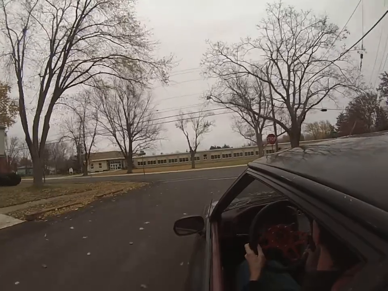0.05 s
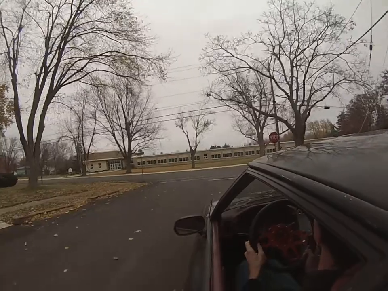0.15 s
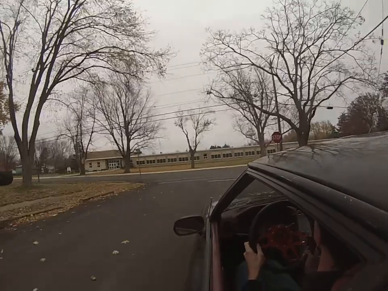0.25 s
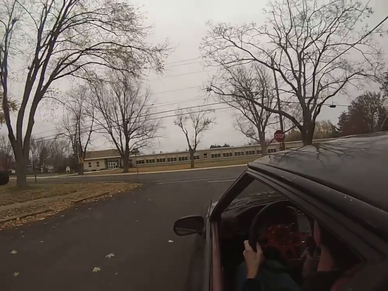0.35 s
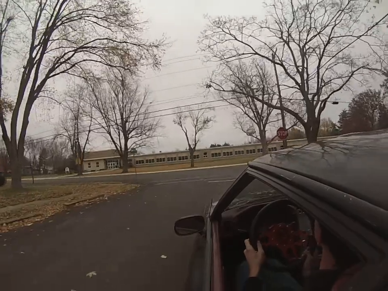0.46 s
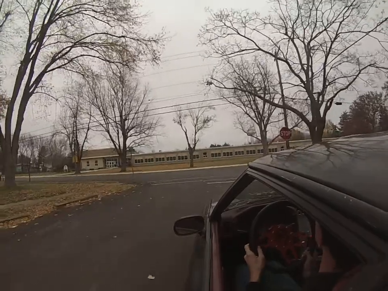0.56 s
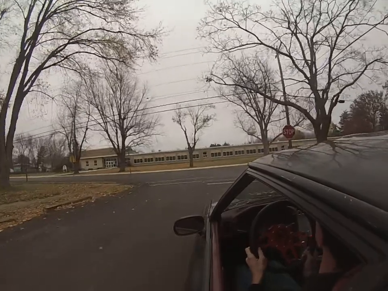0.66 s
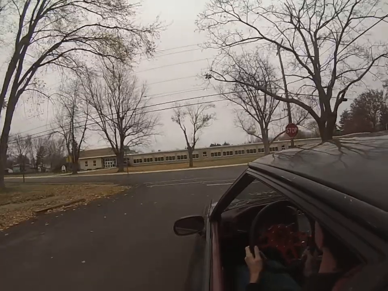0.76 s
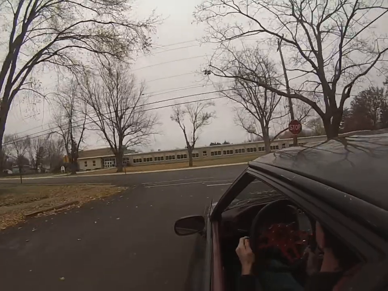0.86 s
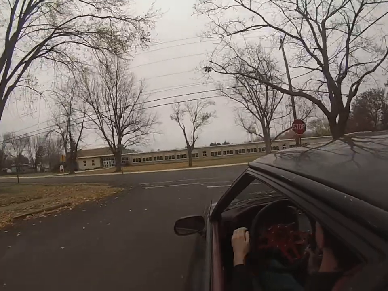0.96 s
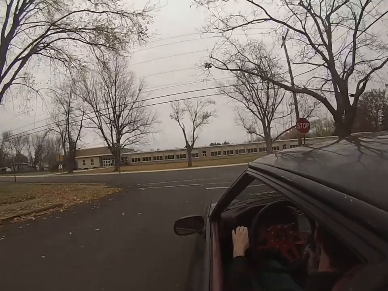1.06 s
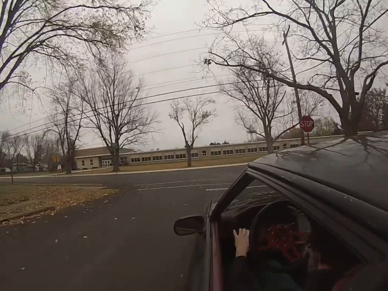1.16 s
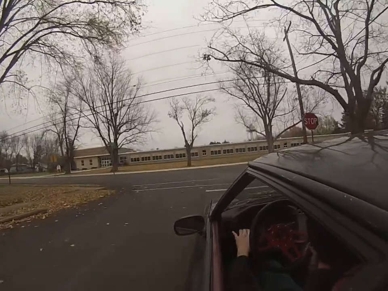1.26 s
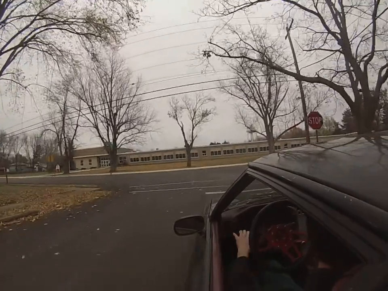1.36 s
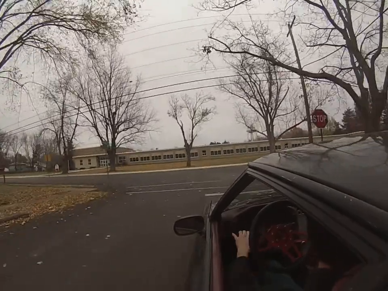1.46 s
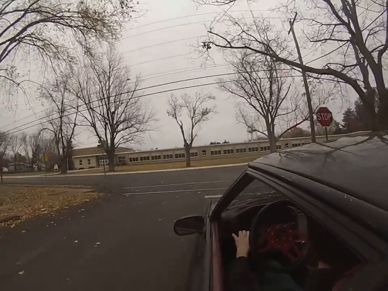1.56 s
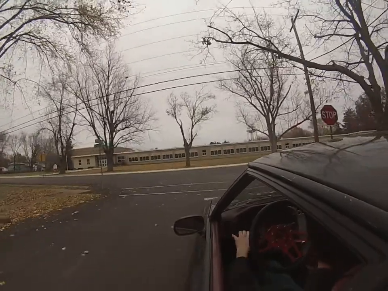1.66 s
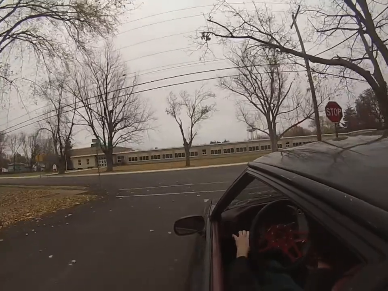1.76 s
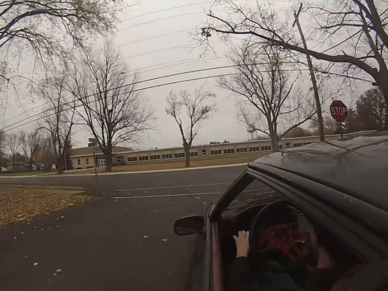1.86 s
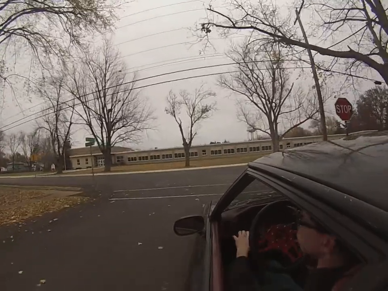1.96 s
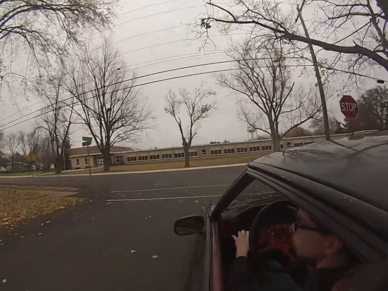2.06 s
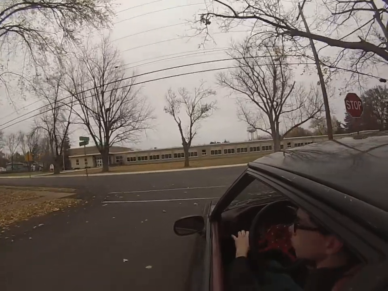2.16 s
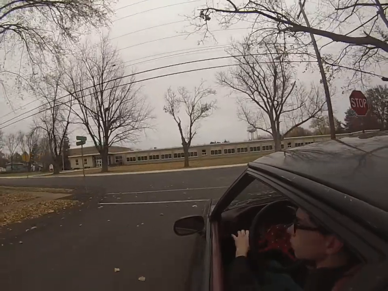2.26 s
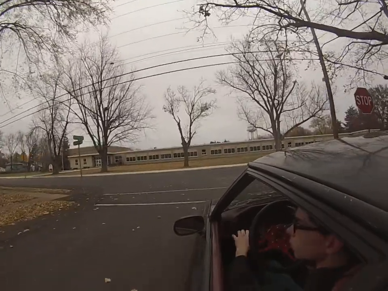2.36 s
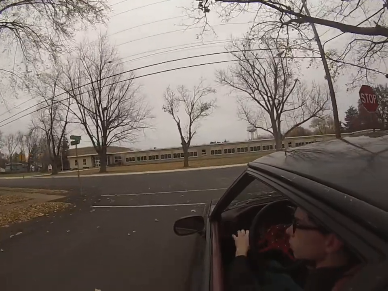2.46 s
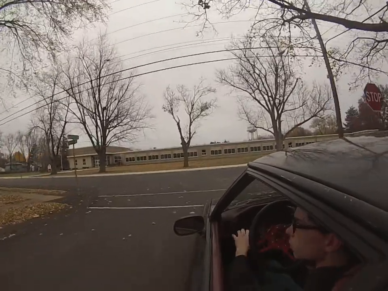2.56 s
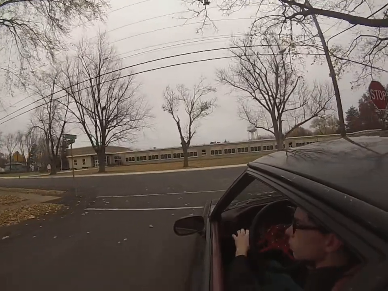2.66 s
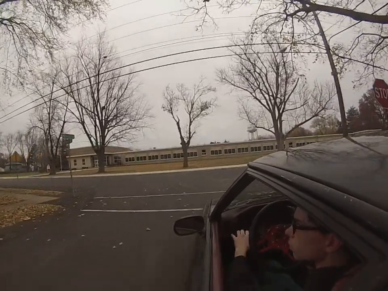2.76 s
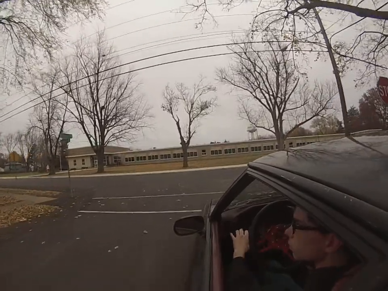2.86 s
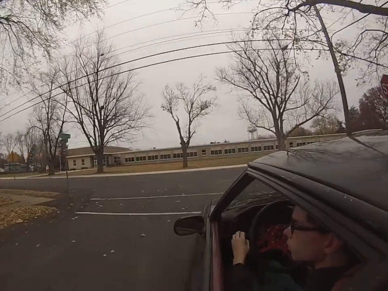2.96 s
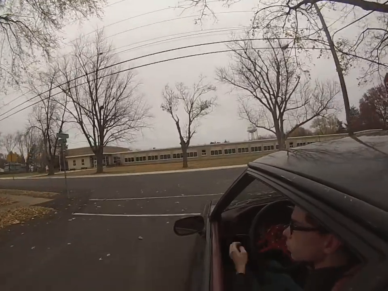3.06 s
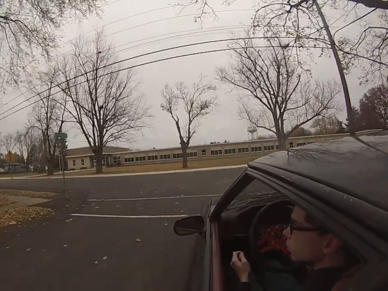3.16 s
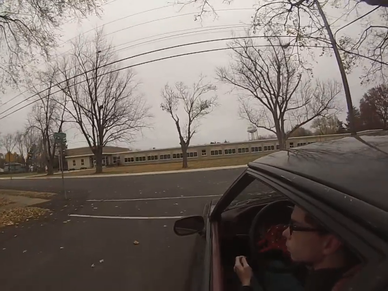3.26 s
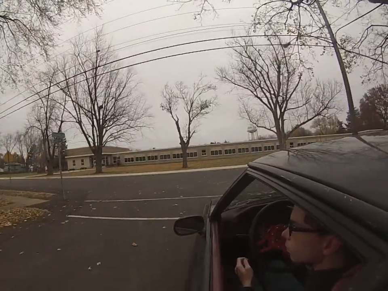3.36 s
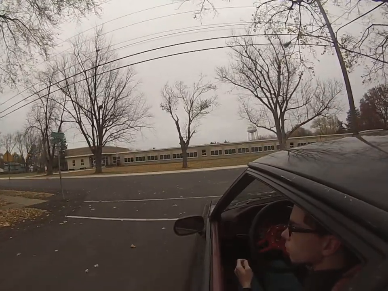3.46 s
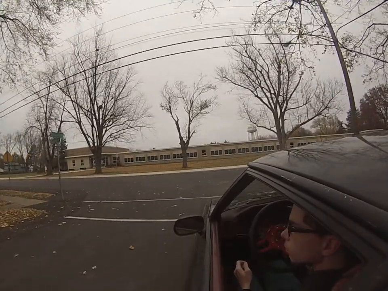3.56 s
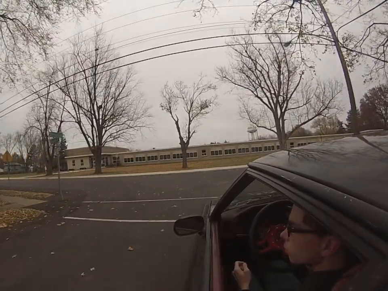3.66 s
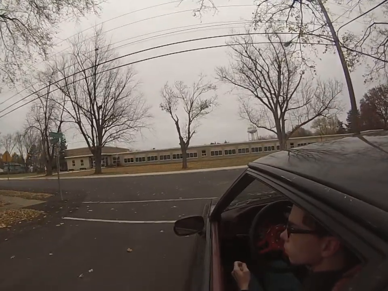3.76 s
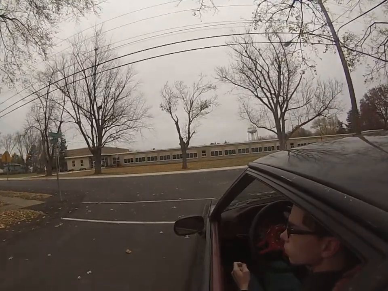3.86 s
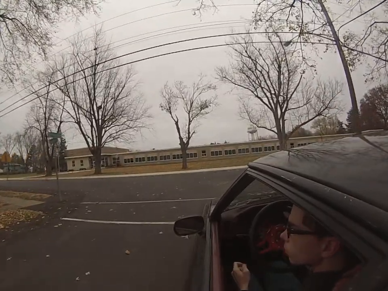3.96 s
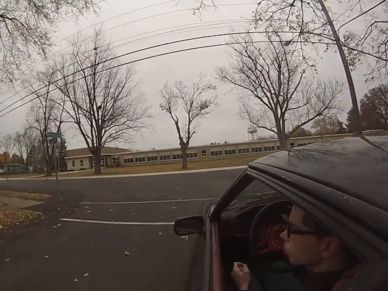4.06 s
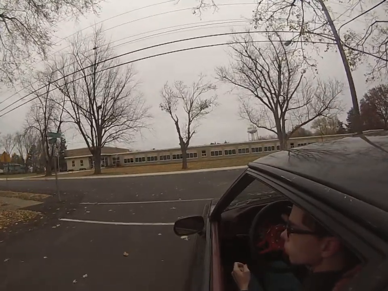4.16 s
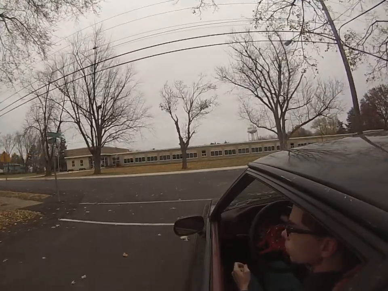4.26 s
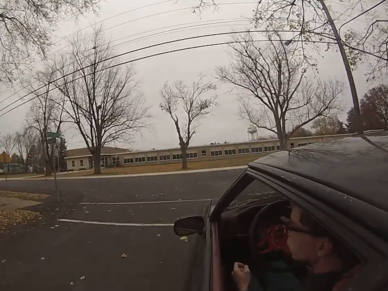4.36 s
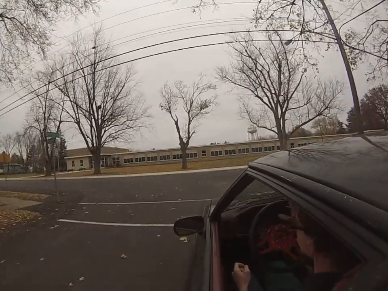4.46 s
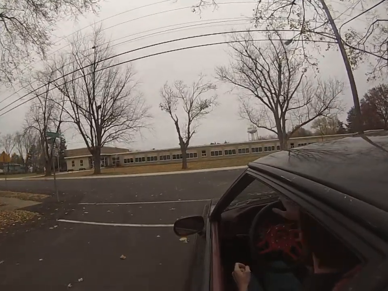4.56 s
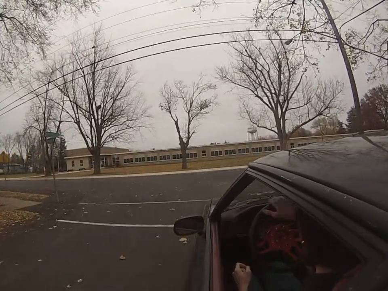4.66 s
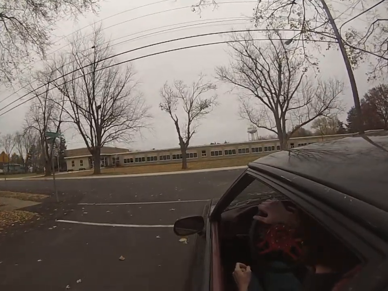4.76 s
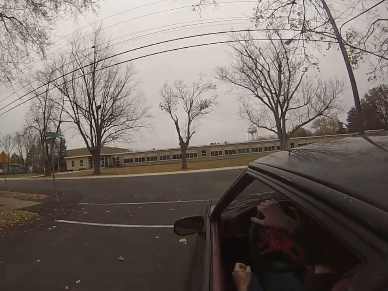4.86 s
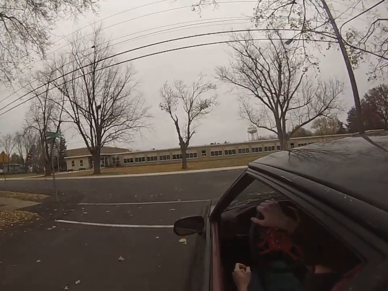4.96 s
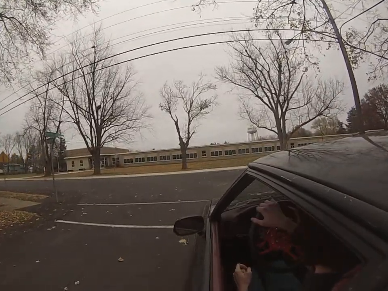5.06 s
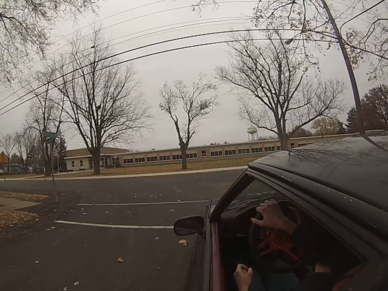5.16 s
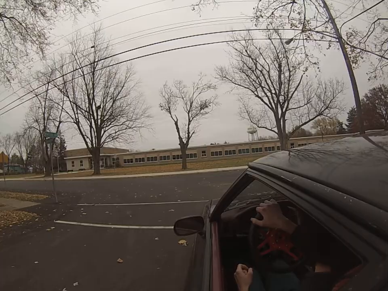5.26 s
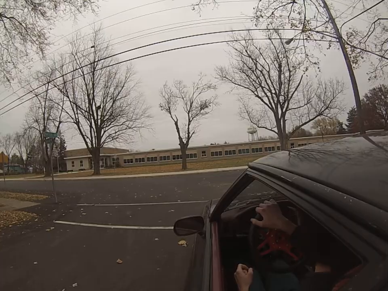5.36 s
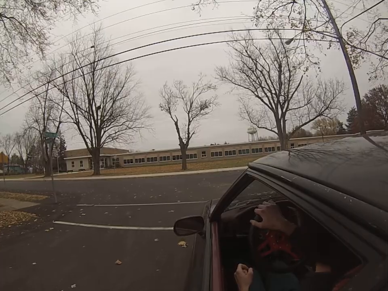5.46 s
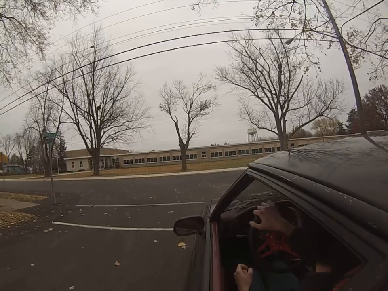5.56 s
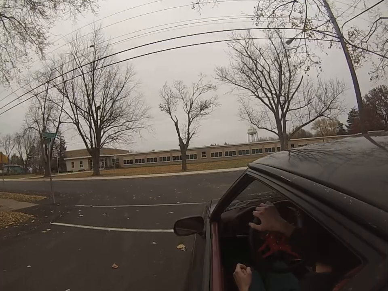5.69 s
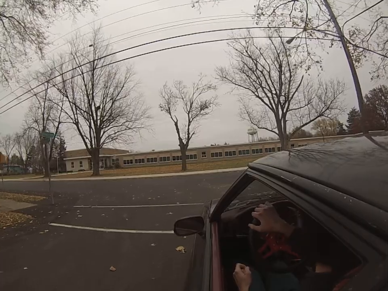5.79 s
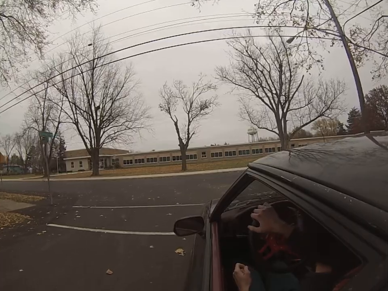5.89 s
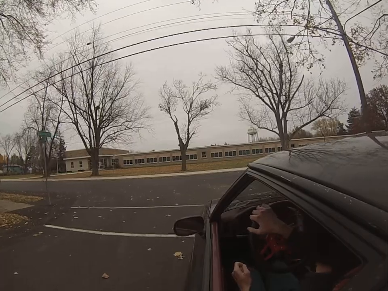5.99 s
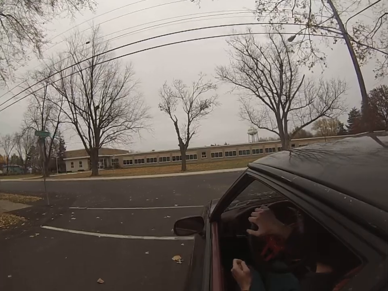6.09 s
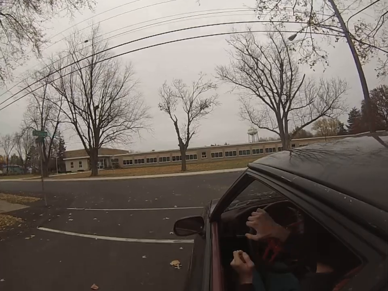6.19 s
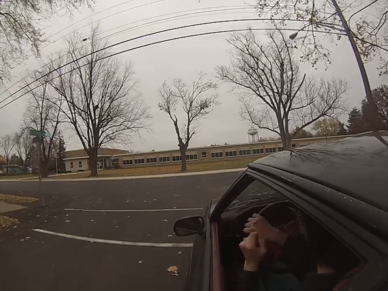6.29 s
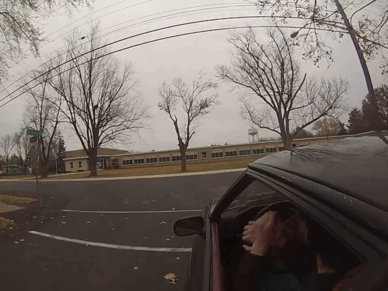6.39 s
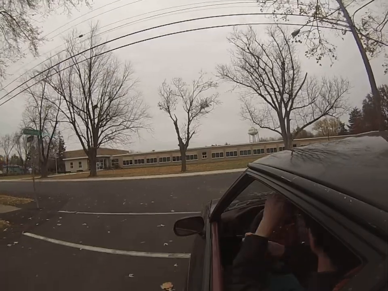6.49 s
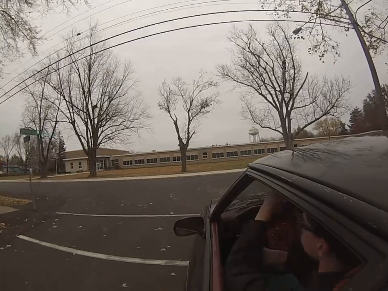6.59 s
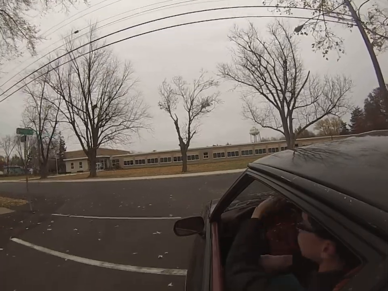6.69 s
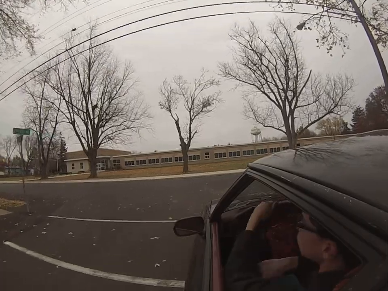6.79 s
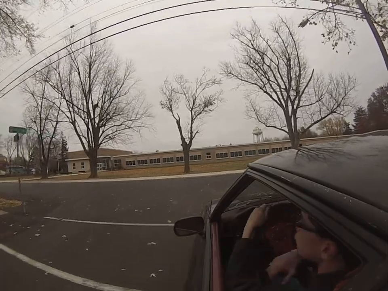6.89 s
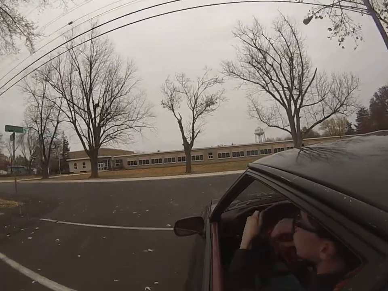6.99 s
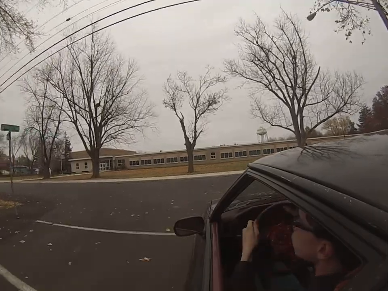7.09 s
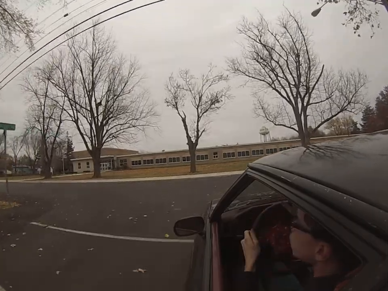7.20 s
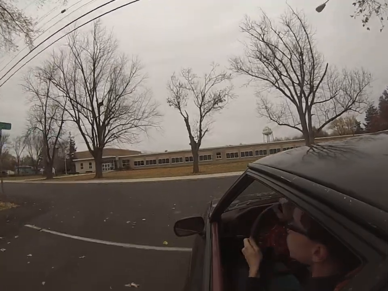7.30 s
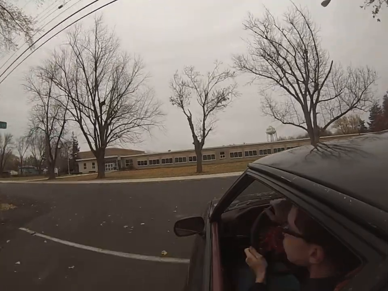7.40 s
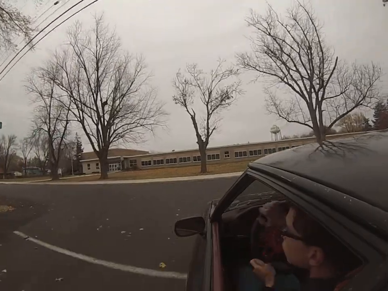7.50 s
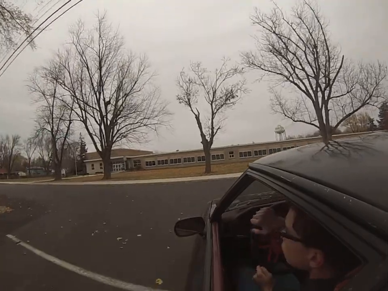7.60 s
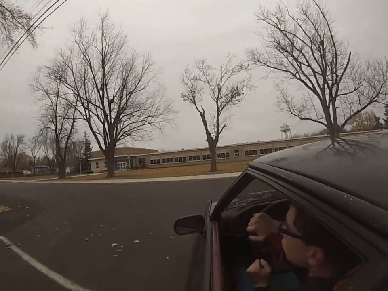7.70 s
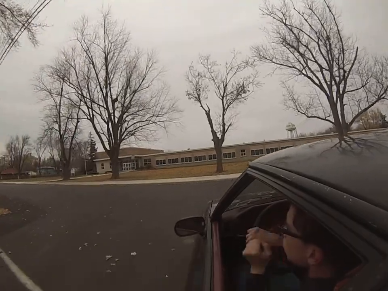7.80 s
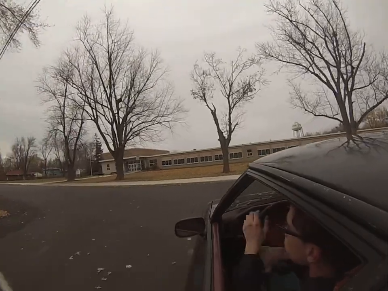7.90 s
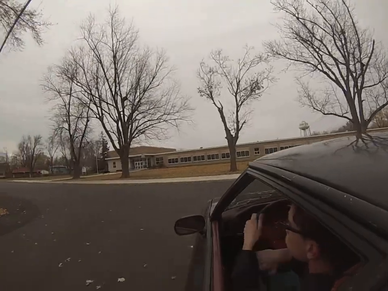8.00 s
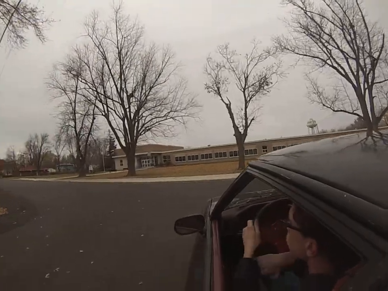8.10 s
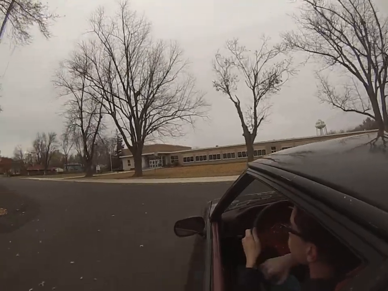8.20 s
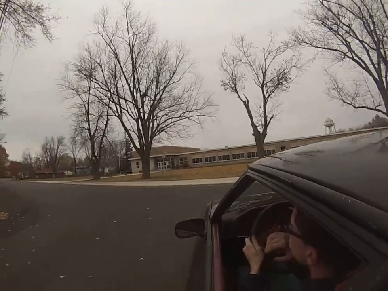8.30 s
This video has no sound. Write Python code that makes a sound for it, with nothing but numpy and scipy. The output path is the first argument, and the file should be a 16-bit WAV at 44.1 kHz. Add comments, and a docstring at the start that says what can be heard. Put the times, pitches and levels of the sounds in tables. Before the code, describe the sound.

Close, boxy, muffled sound on the outside of a sports car in the street, with little wind. First a quiet throbbing idle, low panel drone and fluttering ticks, with a faint mount rattle. The car stops with a soft scuff; irregular pops follow as the throttle is touched. The engine then rises quickly to a buzzing, booming peak, and its pitch falls as the clutch bites, ending in low shudder and loud clatter.

```python
"""On the body of a rotary sports car, with the microphone in a closed housing clamped to it.
The car rolls to a stop at idle, revs up, lets in the clutch and pulls away; the mount then shudders and rattles.
The engine is sines locked to the shaft plus noise that puffs at every firing. Bass comes through the clamp,
the rest through the housing, which rings near 1.5 kHz. Something like a fuel pump ticks steadily in impulses
that ring; knocks and rattles are scatters of impulses that ring too."""
import sys
import numpy as np
from scipy import signal
from scipy.fft import rfft, irfft
from scipy.io import wavfile
from scipy.ndimage import uniform_filter1d

SR = 44100
rng = np.random.default_rng(int(sys.argv[2]) if len(sys.argv) > 2 else 0)


def waveform_to_disk(signal):
    """Save audio, clipped to [-1, 1], as 16-bit WAV at the path in sys.argv[1]."""
    frames = np.transpose(np.atleast_2d(signal))
    scaled = np.clip(frames, -1, 1) * 32767
    samples = np.round(scaled).astype(np.int16)
    wavfile.write(sys.argv[1], SR, samples)


N = 367794


def gain_of(db):
    """Decibels to an amplitude factor."""
    return 10 ** (np.asarray(db) / 20)


def evened(x):
    """Scales to rms 1."""
    return x / np.sqrt(np.mean(x ** 2) + 1e-20)


def read(points, hz):
    """Level in dB of a spectrum at the pitches hz, straight between points on a log pitch scale."""
    point_hz, level_db = np.transpose(points)
    return np.interp(np.log(hz + 1), np.log(point_hz + 1), level_db)


def columns(rows):
    """Every column of a curve over time, sample by sample."""
    time_s, *values = np.transpose(rows)
    return [np.interp(np.arange(N) / SR, time_s, v) for v in values]


def wander(hz):
    """Slow random drift of rms 1 that changes about hz times a second."""
    t = np.arange(0, N / SR + 1, 1 / 200)
    lowpass = np.exp(-(np.fft.rfftfreq(len(t), t[1]) / hz) ** 2)
    drift = irfft(rfft(rng.standard_normal(len(t))) * lowpass, len(t))
    return np.interp(np.arange(N) / SR, t, evened(drift))


def noise(points, gate=1):
    """Noise that swells with gate, then takes the given spectrum; rms 1, silent outside the spectrum."""
    hz = np.fft.rfftfreq(N, 1 / SR)
    inside = (hz >= points[0][0]) & (hz <= points[-1][0])
    spectrum = rfft(gate * rng.standard_normal(N))
    return evened(irfft(spectrum * gain_of(read(points, hz)) * inside, N))


def ring(x, modes):
    """Each impulse of x starts damped sines that swell briefly and die, wider modes sooner."""
    t = np.arange(SR // 8) / SR
    shape = np.zeros(len(t))
    for hz, width_hz, level_db in modes:
        fade = np.pi * width_hz * t
        shape += gain_of(level_db) * (1 - np.exp(-1.5 * fade)) * np.exp(-fade) * np.sin(2 * np.pi * hz * t)
    return signal.oaconvolve(x, shape)[:N]


def bursts(times, level_db, length_s, lean=0.54):
    """A short scatter of random knocks around each time; a smaller lean peaks earlier and trails longer."""
    out = np.zeros(N + SR)
    scatter = rng.standard_normal((len(times), SR // 20))
    counts = np.round(length_s * SR + 0 * np.array(times)).astype(int)
    for s, db, count, row in zip(times, level_db, counts, scatter):
        knocks = row[:count] * np.sin(np.pi * (np.arange(count) / count) ** lean)
        first = round(s * SR) - count // 8
        out[first:][:count] += gain_of(db) * knocks / np.linalg.norm(knocks)  # equal energy before level
    return out[:N]


# throttle: time_s, load (0-1)
THROTTLE = [(0, 0.07), (3.6, 0.03), (4.1, 0.06), (4.35, 0.16), (4.5, 0), (4.6, 0.2), (5, 0.33), (5.3, 0.76),
            (5.6, 0.95), (6.4, 0.96), (7.1, 0.74), (7.5, 0.96), (8.34, 0.57)]


def throttle():
    """Load on the engine, sample by sample."""
    return columns(THROTTLE)[0]


# engine speed: time_s, shaft_speed (turns per second)
SHAFT_SPEED = [(0, 19.2), (1.05, 19.2), (1.3, 20), (3.5, 20), (4.2, 21.9), (4.6, 20.9), (4.95, 23),
               (5.16, 27.3), (5.4, 34.6), (5.61, 39.8), (5.75, 40), (6.1, 43.5), (6.24, 43.1), (6.38, 43.6),
               (6.58, 43.6), (6.69, 43), (6.8, 42.2), (7.29, 37.1), (7.54, 34.3), (7.8, 33.3), (8.34, 30)]
HUNT_HZ, HUNT_SHARE = 1.782, 0.01203  # slow hunting: rate, rms share of the speed at no load


def shaft_turns(load):
    """Speed of the shaft and the turns it has made; it hunts a little, most at idle."""
    (hz,) = columns(SHAFT_SPEED)
    hunt = HUNT_SHARE * (1 - load) * wander(HUNT_HZ)
    return hz, np.cumsum(hz * (1 + hunt + 0.002045 * wander(5.27))) / SR


def speed_change(hz):
    """How fast the shaft speeds up or slows down, in turns a second per second, smoothed over 0.1 s."""
    return uniform_filter1d(abs(np.gradient(hz)) * SR, size=SR // 10)


STOP_S, STOP_FADE_S = 3.832, 0.31  # the car has stopped; the rolling sounds fade out just before


def rolling():
    """1 while the car rolls in, 0 once it has stopped."""
    return np.clip((STOP_S - np.arange(N) / SR) / STOP_FADE_S, 0, 1)


# rocking of the body, once and twice a turn: time_s, rocking_db, thumping_db (rms)
ROCKING = [(0, -32, -35), (.8, -25, -44), (1.1, -49, -39), (1.5, -30.5, -37), (3.3, -30, -44),
           (3.7, -27.5, -34), (4, -45, -46), (4.3, -33.5, -34.5), (4.85, -62, -37), (5.1, -22, -45),
           (5.3, -34, -48), (6.5, -37, -42), (6.85, -39, -42), (7.2, -32, -41)]


def rocking(turns):
    """The body rocks once a turn and thumps at each of the two firings a turn: two wavering sines."""
    rock_db, thump_db = columns(ROCKING)
    rock = gain_of(rock_db + 1.7 * wander(7.4)) * np.sin(2 * np.pi * turns)
    thump = gain_of(thump_db + 3.15 * wander(5.0)) * np.sin(4 * np.pi * turns)
    return np.sqrt(2) * (rock + thump)


# the other shaft orders; two firings a turn favour the even ones:
# order (times a turn), idle_db, full_load_db (before the changes below)
SHAFT_ORDERS = [(3.004, -55.5, -51.5), (3.998, -54, -45.5), (5.007, -52, -47.5), (6, -44.5, -43),
                (6.93, -53.5, -60.5), (8.11, -41, -50), (8.89, -50.5, -57), (9.98, -57, -54),
                (11, -64.5, -61.5), (12.04, -64, -55.5), (13.11, -72, -60.5), (13.95, -66, -55.5),
                (15, -69, -61), (15.95, -59.5, -65), (16.86, -67.5, -64), (17.97, -74.5, -60),
                (20.01, -65, -67), (34, -71, -78.5), (39.77, -67.5, -83.5)]
# exhaust resonances that lift each order as it sweeps through: pitch_hz, level_db at full load
EXHAUST_RESONANCES = [(130, -5.5), (165, 5), (188, 7.5), (212, 1), (235, 1), (260, -3), (290, -10),
                      (330, 3), (370, -4), (415, 3.5), (465, -12), (522, 5.5), (580, -5.5), (700, -5.5),
                      (785, 5.5), (860, -4.5)]
# the sixth order swells as the revs climb and fades as the mount starts to shudder: time_s, level_db
SIXTH_ORDER = [(5.05, -3), (5.2, 5.5), (5.42, 2.5), (5.6, 0.5), (7.3, 0), (7.5, 5.5), (7.75, -6.5),
               (8.34, -11.5)]
ROLLING_DB = 4  # orders above the fourteenth sound fuller while the car still rolls in
RAMP_BLUR = 0.00049  # extra blur while the speed changes: turns per (turn a second per second)


def shaft_orders(hz, turns, load):
    """Multiples of the shaft speed as wavering sines; uneven firings blur the higher ones, least under load."""
    tones = np.zeros(N)
    blur = 0.0074 * (1 - 0.84 * load) + RAMP_BLUR * speed_change(hz)
    for order, idle_db, full_db in SHAFT_ORDERS:
        level_db = idle_db + np.sqrt(load) * (full_db - idle_db + read(EXHAUST_RESONANCES, order * hz))
        level_db += 2.96 * (1 - 0.45 * load) * wander(5.1) + 1.8 * load * wander(17.9)
        if order > 14:
            level_db += ROLLING_DB * rolling()
        if order == 6:
            level_db += columns(SIXTH_ORDER)[0]
        slip = blur * order * wander(8.4)
        tones += gain_of(level_db) * np.sin(2 * np.pi * (order * turns + slip + rng.random()))
    return np.sqrt(2) * tones


def firing_puffs(turns):
    """Two puffs a turn that start sharply and decay; no two firings are alike."""
    firing = 2 * turns
    strength = gain_of(1.4 * rng.standard_normal(SR))[firing.astype(int)]
    return strength * np.exp(-(firing % 1) / 0.33)


# noise of a firing, heard through the housing: pitch_hz, level_db (relative, per Hz)
RASP_COLOUR = [(150, -17.0), (205, 3), (250, -5.5), (450, -11.5), (650, -12.5), (790, -13.5), (900, -22.0),
               (1050, -19), (1160, -14.0), (1330, -15.5), (1580, -7.5), (1750, -13.5), (1950, -12.5),
               (2150, -27.5), (2400, -18.5), (2700, -38.5)]
RASP_DB, RASP_DB_PER_DECADE = -43.5, 18  # level at full load, fall as the load shrinks tenfold


def rasp(puff, load):
    """Firing noise that pulses with the puffs and grows with load."""
    return gain_of(RASP_DB + RASP_DB_PER_DECADE * np.log10(load)) * noise(RASP_COLOUR, 0.32 + puff)


# intake hiss: pitch_hz, level_db (relative, per Hz)
HISS_COLOUR = [(2600, -1), (2900, 0.5), (3400, 0), (3800, 2.5), (4200, -6), (4700, 1.5), (5500, -14.5),
               (6300, -12), (7400, -7.5), (8300, -15.5), (10000, -27.5), (11000, -18.5), (13000, -32),
               (15200, -43)]
HISS_DB, HISS_DB_PER_DECADE = -63, 19  # mean level at full load, fall as the load shrinks tenfold


def intake_hiss(puff, load):
    """Treble noise that wavers, grows with load and pulses gently at the firings."""
    level_db = HISS_DB + HISS_DB_PER_DECADE * np.log10(load) + 1.1 * wander(6.9)
    return gain_of(level_db) * noise(HISS_COLOUR, 1.8 + puff)


# background of the running car, heard through the housing: pitch_hz, level_db (relative, per Hz)
BACKGROUND_COLOUR = [(250, -16), (320, -5.5), (400, -7.5), (470, -10), (560, -8.5), (700, -9), (790, -10.5),
                     (900, -16), (1050, -16), (1160, -13), (1300, -14), (1510, -6), (1750, -15.5),
                     (1950, -32)]
# smooth treble floor: pitch_hz, level_db (relative, per Hz)
TREBLE_COLOUR = [(1900, 1.5), (2400, -1.5), (3000, -4), (4000, -6), (5500, -9.5), (8000, -14), (11000, -19),
                 (13000, -22.5), (14500, -37), (15200, -39.5)]
BACKGROUND_DB, TREBLE_DB = -53, -11.5  # level of the background, treble floor beside it


def background(puff):
    """Steady noise with a slight shared flutter; the lower part pulses faintly at the firings."""
    flutter = gain_of(0.77 * wander(17.0))
    low = noise(BACKGROUND_COLOUR, flutter * (6.4 + puff))
    return gain_of(BACKGROUND_DB) * (low + gain_of(TREBLE_DB) * noise(TREBLE_COLOUR, flutter))


PUMP_HZ, PUMP_SPREAD_DB = 19.0, 1.8  # strokes a second, random spread of their strength
# knocks within one pump stroke: time_s, tick_db, body_db
PUMP_STROKE = [(.0002, -5.5, -14), (.035, -17, -8.5), (.0411, -8, -3.5), (.0465, -11, -1)]
# ringing of the tick: pitch_hz, width_hz, level_db
PUMP_TICK_MODES = [(1176, 36, -45), (1343, 40, -38), (1464, 119, -33), (1523, 39, -43), (1675, 130, -42.5)]
# ringing of the body: pitch_hz, width_hz, level_db
PUMP_BODY_MODES = [(117, 17.4, -21.5), (218, 21, -29.5), (797, 54, -46.5)]


def pump():
    """A few ringing knocks a stroke at a clock-steady rate, a little uneven in strength."""
    starts = np.arange(0, N / SR, 1 / PUMP_HZ)
    tick, thump = np.zeros(N + SR), np.zeros(N + SR)
    uneven = gain_of(PUMP_SPREAD_DB * rng.standard_normal((len(starts), len(PUMP_STROKE))))
    for k, (s, tick_db, body_db) in enumerate(PUMP_STROKE):
        at = np.round((starts + s) * SR).astype(int)
        tick[at] = gain_of(tick_db) * uneven[:, k]
        thump[at] = gain_of(body_db) * uneven[:, k]
    return ring(tick[:N], PUMP_TICK_MODES) + ring(thump[:N], PUMP_BODY_MODES)


# air of a pump stroke: pitch_hz, level_db (relative, per Hz)
CHUFF_COLOUR = [(680, -14), (790, -2), (900, -18.5), (1080, -16), (1180, -2.5), (1350, -6.5), (1510, 1.5),
                (1700, -7), (1850, -20)]
CHUFF_DB, CHUFF_S, CHUFF_WIDTH_S = -59, 0.046, 0.008  # level, middle within the stroke, spread


def pump_chuff():
    """A soft bell-shaped puff of noise with every pump stroke."""
    strokes = (np.arange(N) / SR - CHUFF_S) * PUMP_HZ + .5
    strength = gain_of(PUMP_SPREAD_DB * rng.standard_normal(SR))[strokes.astype(int)]
    from_middle_s = (strokes % 1 - .5) / PUMP_HZ
    gate = strength * np.exp(-.5 * (from_middle_s / CHUFF_WIDTH_S) ** 2)
    return gain_of(CHUFF_DB) * noise(CHUFF_COLOUR, gate)


# shaking of the body: time_s, rumble_db (in the clamp), drone_db (of the panels)
SHAKING = [(0, -32.5, -33), (1.0, -31, -32.5), (1.72, -26.5, -33.5), (1.92, -32, -30), (2.02, -46, -38.5),
           (2.3, -29, -34.5), (3.2, -32.5, -43.5), (4.2, -32, -42.5), (5.2, -37, -37), (5.9, -43.5, -39.5),
           (6.7, -30.5, -38.5), (7.0, -22.5, -30.5), (7.2, -16, -32.5), (7.3, -23, -30.5),
           (7.5, -20.5, -25.5), (7.76, -23, -29.5), (8.34, -24, -26)]
# rumble through the clamp: pitch_hz, level_db (relative, per Hz)
RUMBLE_COLOUR = [(3.5, -28.5), (6.0, -9.5), (22, 12), (38, -9), (110, -18.5), (140, -34.5), (240, -120)]


def clamp_rumble():
    """Lumpy low noise that comes through the clamp."""
    rumble_db, _ = columns(SHAKING)
    return gain_of(rumble_db + 1.5 * wander(8.8)) * noise(RUMBLE_COLOUR)


# panel drone while the car rolls to its stop: pitch_hz, level_db (relative, per Hz)
ROLLING_DRONE_COLOUR = [(29, -14), (46, 6.5), (60, 4.5), (82, -1), (102, 4.5), (134, -1), (162, -6),
                        (214, -10.5), (253, -32.5), (600, -41.5), (1320, -120)]
# panel drone afterwards: pitch_hz, level_db (relative, per Hz)
DRONE_COLOUR = [(29, -20.5), (46, 10.5), (60, -5), (82, -1), (102, 6.5), (134, 1), (162, 0), (214, -5.5),
                (253, -25.5), (318, -20.5), (448, -38), (600, -27), (780, -56), (1320, -120)]
THROB = 0.6  # how far the drone swells at a firing of middling strength


def panel_drone(turns):
    """Low noise of the panels that throbs unevenly with the firings."""
    _, drone_db = columns(SHAKING)
    firing = 2 * turns
    strength = gain_of(3.0 * rng.standard_normal(SR))[firing.astype(int)]
    throb = 1 + THROB * strength * np.sin(np.pi * firing) ** 2
    drone = rolling() * noise(ROLLING_DRONE_COLOUR, throb) + (1 - rolling()) * noise(DRONE_COLOUR, throb)
    return gain_of(drone_db + 1.5 * wander(2.6)) * drone


# tyre hum: pitch_hz, level_db (relative, per Hz)
TYRE_COLOUR = [(260, -21), (320, 4.5), (400, -0.5), (470, -11)]


def tyre_hum():
    """Narrow noise of the tyres until the car stops."""
    return rolling() * gain_of(-59.5) * noise(TYRE_COLOUR)


# rattles of the mount: start_s, length_s, click_db, crack_db, thud_db, jolt_db, jolt_direction (1 or -1)
MOUNT_RATTLES = [(1.481, .004, -48, -56, -58, -50, 1), (1.742, 0.0072, -39, -41, -51, -35, 1),
                 (1.807, 0.0034, -41, -56, -61, -37, 1), (7.742, 0.0069, -58, -43, -37, -13, 1),
                 (7.748, 0.0049, -35, -50, -50, -24, -1), (7.7567, 0.012, -32.5, -28, -32, -17, 1),
                 (7.81, 0.011, -48, -34, -30, -12.5, 1), (7.828, 0.008, -31.5, -32, -36, -12, 1),
                 (7.851, 0.0095, -58, -41, -43, -22, -1), (7.8825, 0.01, -64, -33, -27, -17, 1),
                 (7.915, 0.0066, -48, -49, -50, -29, -1), (7.943, 0.0066, -52, -36, -47, -31, 1),
                 (7.966, 0.0094, -42, -39, -23, -11, 1), (7.983, .005, -36, -55, -50, -39, 1),
                 (7.9943, 0.0046, -33, -27.5, -38, -9.5, 1), (8.004, 0.013, -46, -27, -25, -25, -1),
                 (8.025, 0.0092, -28, -37, -48, -20, -1), (8.048, 0.0085, -45, -31, -39, -22, 1),
                 (8.064, 0.011, -29.5, -28, -35, -11, 1), (8.081, .01, -55, -30, -30, -27, -1),
                 (8.105, 0.0034, -44, -44, -48, -17, -1), (8.113, 0.0036, -43, -45, -52, -33, 1),
                 (8.123, 0.018, -54, -30, -21.5, -11.5, 1), (8.138, 0.0045, -39, -50, -50, -14, -1),
                 (8.153, 0.0031, -36, -45, -54, -16, 1), (8.1614, 0.016, -61, -27, -22, -16, -1),
                 (8.208, 0.0047, -46, -46, -50, -18.5, 1), (8.212, 0.011, -45, -26, -18.5, -21, -1),
                 (8.224, 0.0062, -29.5, -15.5, -22.5, -8, 1), (8.254, 0.0077, -58, -45, -45, -33, -1),
                 (8.267, 0.0053, -40, -34.5, -33, -21, -1), (8.275, 0.0031, -44, -43, -53, -33, 1),
                 (8.301, 0.0089, -44, -26, -26, -18, 1), (8.32, 0.004, -42, -42, -46, -19, 1),
                 (8.323, 0.01, -53, -28, -26, -11.5, -1)]
# ringing of the three parts of a rattle, each: pitch_hz, width_hz, level_db
CLICK_MODES = [(4210, 820, -0.5), (6400, 1150, -0.5), (9550, 1650, -6.5), (12500, 3000, -24)]
CRACK_MODES = [(1352, 160, -4), (1600, 330, 6), (1940, 258, -5.5), (3200, 520, -5), (4200, 450, -15)]
THUD_MODES = [(290, 240, 9), (477, 210, 1), (724, 84, -1.5)]
CLICK_TAIL_DB, TAIL_DB = -22, -14.5  # weaker trailing knocks: beside the click, beside the crack and thud
TAIL_STRETCH = 3.5  # the tail lasts this many times the rattle, up to 40 ms


def mount_rattles():
    """Each rattle is a scatter of knocks, part click, crack and thud, near the bottom of a slow jolt."""
    s, length_s, click_db, crack_db, thud_db, jolt_db, direction = np.transpose(MOUNT_RATTLES)
    u = np.linspace(-5, 5, round(.06 * SR))
    swing = (u ** 2 - 0.41 * u - 1) * np.exp(-u ** 2 / 2)  # out, hard back against the stop, out again
    swing -= 0.61 * np.exp(-(u / 0.3) ** 2)  # the stop sharpens the bottom of the swing
    jolts = np.zeros(N)
    jolts[np.round((s + .004) * SR).astype(int)] = np.sign(direction) * gain_of(jolt_db)
    tail_s = np.minimum(TAIL_STRETCH * length_s, 1 / 25)
    out = signal.oaconvolve(jolts, swing, "same")
    parts = ((click_db, CLICK_TAIL_DB, CLICK_MODES), (crack_db, TAIL_DB, CRACK_MODES), (thud_db, TAIL_DB, THUD_MODES))
    for db, tail_db, modes in parts:
        knocks = bursts(s, db, length_s, lean=1.0)
        tail = bursts(s + length_s, db + tail_db, tail_s, lean=0.19)
        out += ring(knocks + tail, modes)
    return out


# the sharpest single firings: time_s, level_db (before the housing rings)
SHARP_FIRINGS = [(3.2075, -38), (3.2306, -41), (3.252, -42), (3.281, -40), (3.3036, -41), (3.405, -43),
                 (3.6007, -41), (3.9153, -39), (3.972, -38), (4.002, -40), (4.0407, -38), (4.054, -34),
                 (4.1065, -36), (4.133, -33.5), (4.2487, -44), (4.3051, -44), (4.3404, -37.5),
                 (4.3645, -38), (4.461, -59), (4.577, -36), (4.6, -35), (4.6497, -35), (4.697, -37),
                 (4.7203, -41), (4.766, -36), (4.789, -38), (4.8571, -35), (4.8826, -36), (4.9263, -33),
                 (4.9505, -33), (5.01, -38), (5.0537, -31), (5.251, -46), (5.299, -43), (5.374, -31),
                 (5.525, -35), (5.6275, -33), (5.8138, -29), (6.2373, -30), (6.3634, -39), (6.4444, -33),
                 (6.5131, -29), (6.939, -28), (7.4725, -29.5)]
# ringing of the housing: pitch_hz, width_hz, level_db
HOUSING_MODES = [(758, 310, -3), (1200, 250, -7), (1537, 200, 8.5), (1720, 86, -4), (2423, 88, -14.5),
                 (3770, 1100, -10.5), (5000, 650, -16.5)]
POP_CHANCE, POP_DB = 0.27, -41.5  # other firings: share that pops at full load, level before ringing


def pops(turns, load):
    """The sharpest firings ring the housing; others come by chance, more often under load."""
    s, db = np.transpose(SHARP_FIRINGS)
    firings = np.flatnonzero(np.diff(np.floor(2 * turns)))[1:]
    popping = rng.random(SR)[:len(firings)] < POP_CHANCE * load[firings] ** 2
    at = firings[popping]
    return ring(bursts(s, db, 0.0082) + bursts(at / SR, POP_DB + 0 * at, 0.0038), HOUSING_MODES)


# a soft scuff as the car stops: pitch_hz, width_hz, level_db
SCUFF_MODES = [(323, 97, -30), (363, 60, -23.5), (460, 69, -33), (768, 100, -29)]


def stopping_scuff():
    """One ringing scatter of knocks as the car stops."""
    return ring(bursts([STOP_S], [0], 0.048), SCUFF_MODES)


# booming of the fourth order as it meets the exhaust resonance: time_s, level_db (rms, at steady speed)
EXHAUST_BOOM = [(4.6, -64), (5.27, -37), (5.85, -35), (6.06, -38), (6.13, -20), (6.19, -18.5),
                (6.33, -28.5), (6.45, -20.5), (6.55, -28), (6.63, -22), (6.78, -29), (6.88, -24),
                (7.05, -31), (7.17, -39), (7.3, -56)]
BOOM_HZ, BOOM_HOLDS_S = 171, 6.4  # from then on the boom stays on the resonance while the revs fall


def exhaust_boom(hz, turns):
    """A sine at four times the shaft speed, ragged while the speed changes, later held up to the resonance."""
    (boom_db,) = columns(EXHAUST_BOOM)
    boom_db = boom_db - 0.17 * speed_change(hz) * abs(wander(12.0))
    after_hold = np.arange(N) / SR > BOOM_HOLDS_S
    held_cycles = np.cumsum(np.maximum(BOOM_HZ - 4 * hz, 0) * after_hold) / SR
    return np.sqrt(2) * gain_of(boom_db) * np.sin(2 * np.pi * (4 * turns + held_cycles))


BUZZ_DB, BUZZ_DB_PER_DECADE = -50, 23  # at full load before colour, fall as the load shrinks tenfold
BUZZ_EVEN_DB = 3  # lift of the even orders


def buzz(hz, turns, load):
    """Regular firings under load: wavering shaft orders 19 to 47, coloured like the rasp."""
    slip = 0.00098 * wander(5.2)
    base_db = BUZZ_DB + BUZZ_DB_PER_DECADE * np.log10(load)
    out = np.zeros(N)
    for order in range(19, 48):
        level_db = base_db + read(RASP_COLOUR, order * hz) + BUZZ_EVEN_DB * (order % 2 == 0)
        level_db += 3.1 * wander(5.4)
        out += gain_of(level_db) * np.sin(2 * np.pi * (order * (turns + slip) + rng.random()))
    return out


# a low roar fills in as the throttle opens and again as the revs fall: time_s, level_db
ROAR_LEVEL = [(5.0, -65), (5.22, -48.5), (5.4, -44), (5.9, -49.5), (6.2, -56), (6.8, -55), (7.1, -53),
              (7.5, -48), (7.75, -50)]
# its spectrum: pitch_hz, level_db (relative, per Hz)
ROAR_SPECTRUM = [(180, 2.5), (260, -4), (330, -5), (450, -10), (600, -11), (800, -15), (1200, -16.5),
                 (1600, -18)]


def roar(puff):
    """Low noise that pulses with the firings."""
    return gain_of(columns(ROAR_LEVEL)[0]) * noise(ROAR_SPECTRUM, 0.5 + puff)


# shudder of the mount: time_s, level_db (rms)
MOUNT_SHUDDER = [(7.68, -50), (7.76, -20), (7.88, -23), (8.0, -18), (8.14, -19), (8.22, -26), (8.34, -30)]
SHUDDER_HZ = 38.3


def mount_shudder():
    """The mount shudders at its own pitch, apart from the engine: one sine with a slightly unsteady phase."""
    (level_db,) = columns(MOUNT_SHUDDER)
    cycles = SHUDDER_HZ * np.arange(N) / SR + 0.022 * wander(4.0)
    return np.sqrt(2) * gain_of(level_db) * np.sin(2 * np.pi * cycles)


# brief dips in the level of the airborne sound: start_s, depth_db (before recovery sets in)
LEVEL_DIPS = [(7.766, -12), (8.035, -6), (8.17, -4), (8.238, -6)]
DIP_RECOVERY_S = 0.14


def dips():
    """Gain that drops within 12 ms at each dip and creeps back."""
    s, db = np.transpose(LEVEL_DIPS)
    after = np.arange(N)[:, None] / SR - s
    drop = np.clip(after / 0.012, 0, 1)
    recovery = np.exp(-np.maximum(after, 0) / DIP_RECOVERY_S)
    return gain_of((db * drop * recovery).sum(1))


def scene():
    """All sources, one channel; the dips touch only the airborne engine noise, the buzz and the pump."""
    load = throttle()
    hz, turns = shaft_turns(load)
    engine_load = np.clip(load, .005, 1)
    puff = firing_puffs(turns)
    tones = rocking(turns) + shaft_orders(hz, turns, engine_load) + exhaust_boom(hz, turns)
    airborne = rasp(puff, engine_load) + intake_hiss(puff, engine_load) + background(puff)
    airborne += buzz(hz, turns, engine_load) + roar(puff) + pump() + pump_chuff()
    body = clamp_rumble() + panel_drone(turns) + tyre_hum() + stopping_scuff()
    mount = mount_rattles() + mount_shudder()
    return (tones + dips() * airborne + body + mount + pops(turns, load))[None]


def record(dry):
    """The microphone's band limit: a steep low-pass at 15.2 kHz."""
    padded = np.pad(dry, ((0, 0), (255, 255)), "reflect", reflect_type="odd")
    lowpass = signal.firwin(511, 15200, window=("kaiser", 9), fs=SR)
    return signal.oaconvolve(padded, lowpass[None], "valid")


dry = scene()
out = record(dry)
waveform_to_disk(out)
```